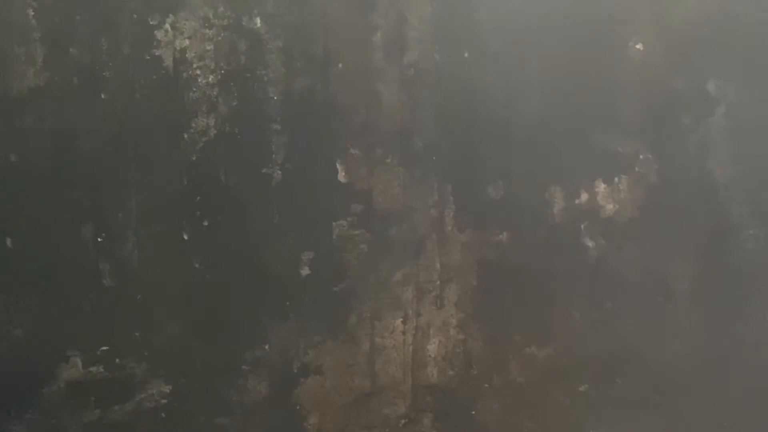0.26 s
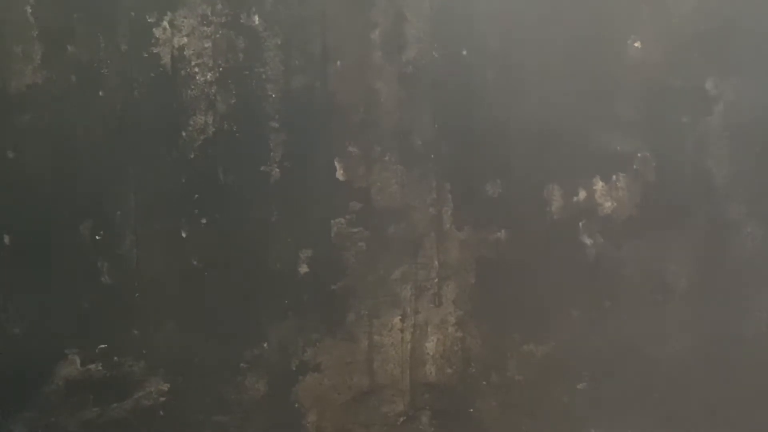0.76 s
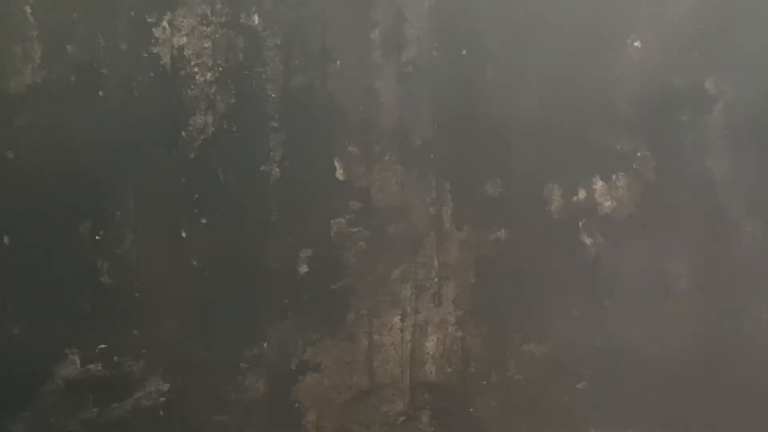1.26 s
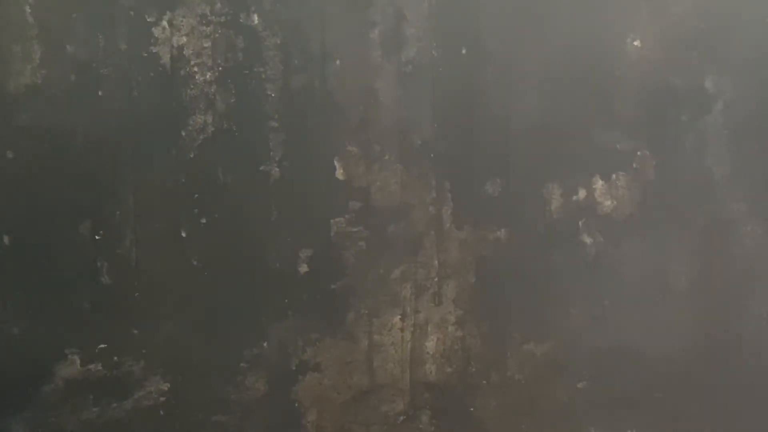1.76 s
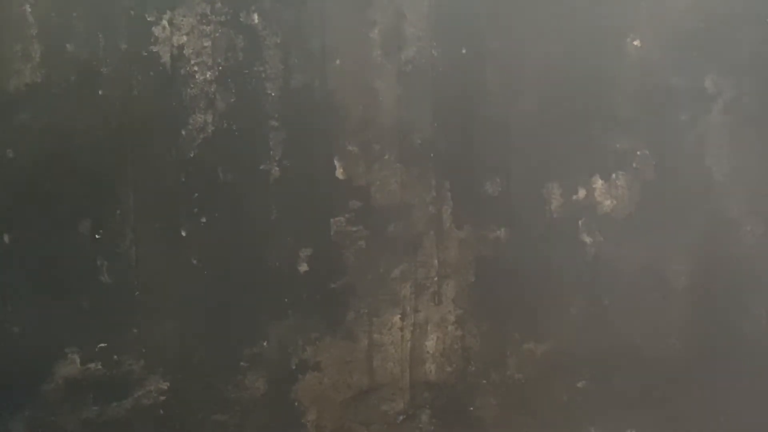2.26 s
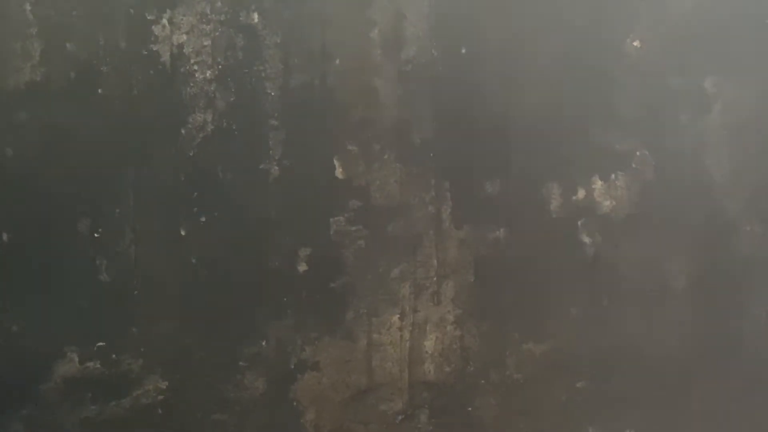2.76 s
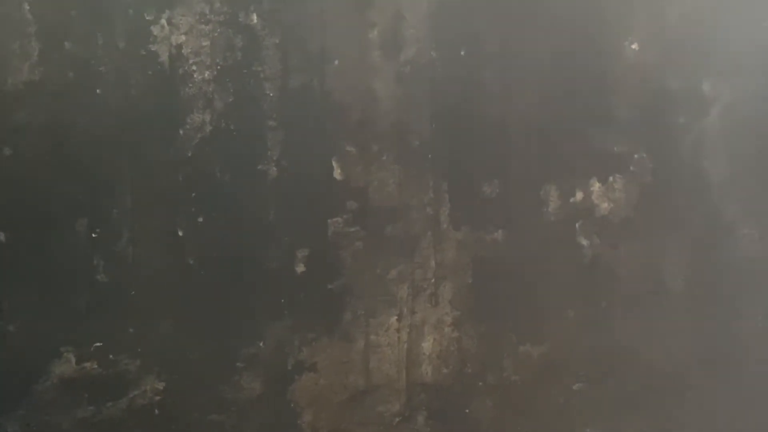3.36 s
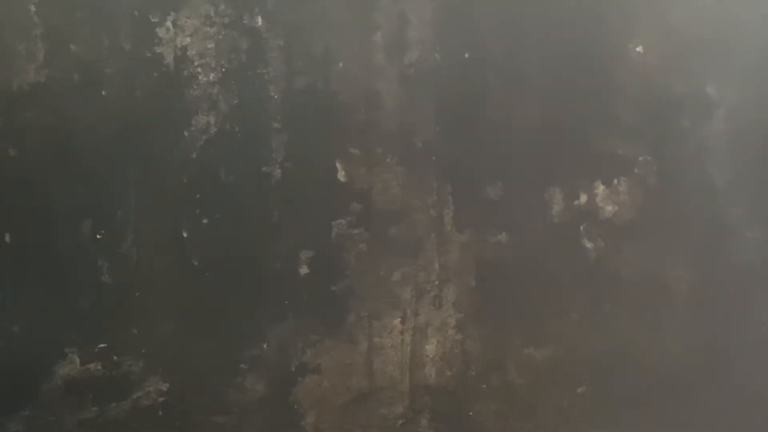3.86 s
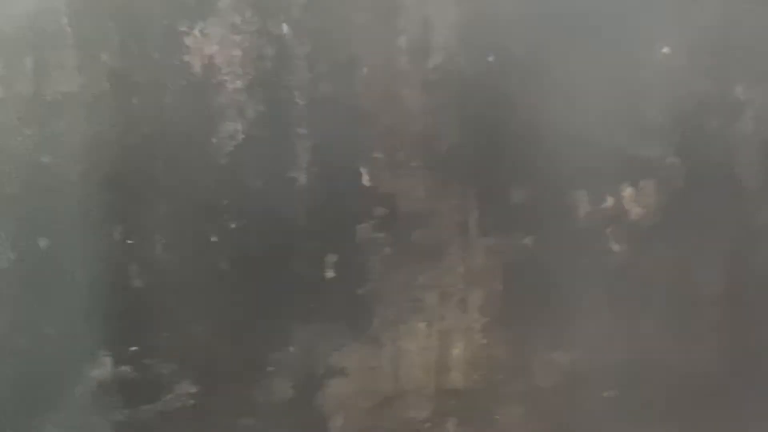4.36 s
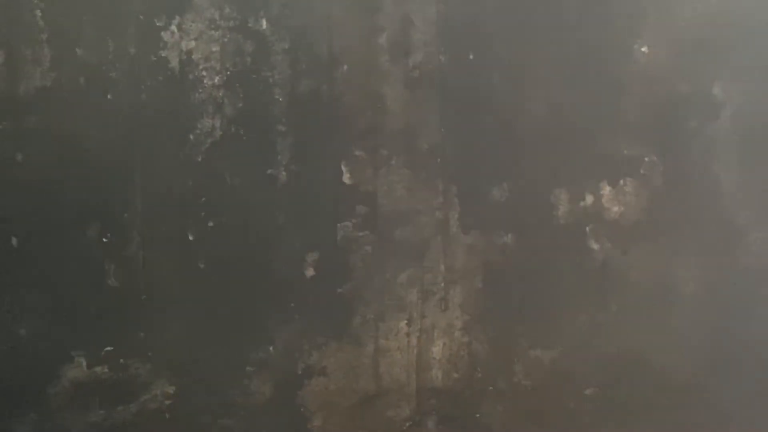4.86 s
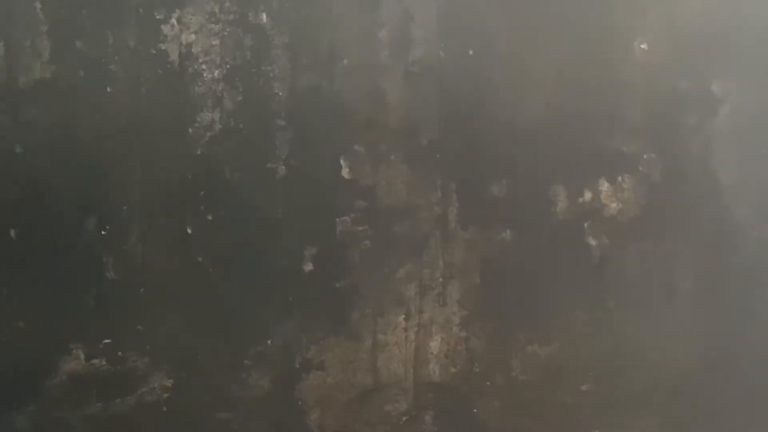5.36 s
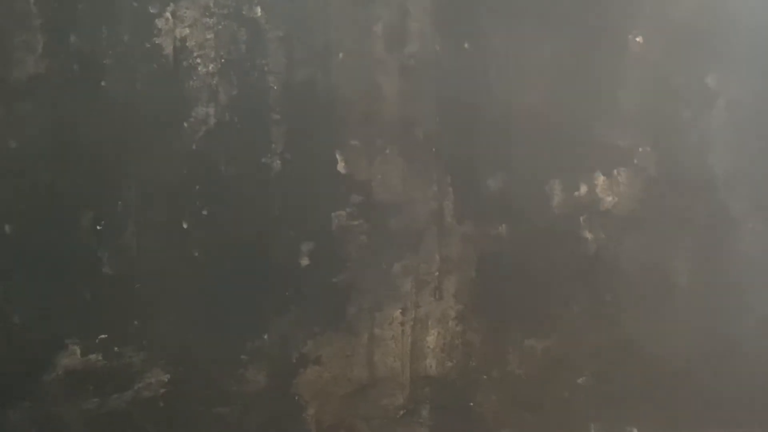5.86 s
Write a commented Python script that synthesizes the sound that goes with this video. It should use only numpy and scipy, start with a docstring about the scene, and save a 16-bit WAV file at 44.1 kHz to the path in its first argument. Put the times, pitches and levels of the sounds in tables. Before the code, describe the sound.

Steady deep roar of a subway car running through a tunnel, faint motor whine, one sharp knock on the window pane with quick bounces.

```python
"""Subway car in a tunnel, close to the window

Stereo microphone held near the pane: noise shaped by body resonances makes the rolling roar, wavering
sines the faint whine of motors and converter, short low cycles the thumps through the floor. Once something
knocks sharply on the pane and bounces twice: falling bending waves and short ringing ticks.
A limiter ducks the roar under the peaks, holds it down and lets go."""
import sys
import numpy as np
from scipy import signal
from scipy.fft import rfft, irfft, next_fast_len
from scipy.io import wavfile
from scipy.ndimage import minimum_filter1d

SR = 44100
rng = np.random.default_rng(int(sys.argv[2]) if len(sys.argv) > 2 else 0)


def output_pcm(signal):
    """Save a mono or channel-first signal as 16-bit PCM at the path in sys.argv[1].

    Samples are clipped to [-1, 1] before scaling.
    """
    pcm = np.clip(np.atleast_2d(signal).T, -1, 1) * 32767
    wavfile.write(sys.argv[1], SR, np.round(pcm).astype(np.int16))


N = 269890  # samples, about 6.1 s

# Above the first frequency left and right alternate between in phase and opposed;
# each half turn spans the second.
TURN_FROM_HZ, HALF_TURN_HZ = 7000, 1960


def from_db(db):
    """Amplitude gain of a level in dB."""
    return 10 ** (np.asarray(db) / 20)


def at_hz(rows, hz):
    """Columns of a table, joined by lines on a log-frequency axis."""
    f, *columns = np.transpose(rows)
    return [np.interp(np.log(hz), np.log(f), c) for c in columns]


def drift(rate_hz):
    """Slow random wander of spread 1: noise through two equal low-pass poles at the rate."""
    step = 40  # samples between drawn points
    r = np.exp(-2 * np.pi * step * rate_hz / SR)
    noise = rng.standard_normal(N // step + 4002)
    slow = signal.lfilter([1], [1, -2 * r, r * r], noise)[4000:]  # settled part only
    return np.interp(np.arange(N) / step, np.arange(len(slow)), slow / slow.std())


def roar(surge_db, flutter_db):
    """Wheel and rail noise in the car body; the right port hears part of the same noise, shifted in phase."""
    # Roar at the left port before the body resonances: f/Hz, level/dB per Hz
    roar_spectrum = [(22, -71), (43, -58.5), (60, -50), (300, -52), (400, -54), (680, -58.5), (790, -59.5),
                     (1050, -59.5), (1300, -63.5), (2500, -65), (3700, -72), (4200, -78.5), (4900, -79.5),
                     (7500, -93.5), (11200, -103), (12200, -112), (15000, -119)]
    # Droning resonances of the car body: f/Hz, width/Hz, level above the roar/dB
    body_modes = [(69.3, 3.3, 8), (112, 21.4, 5.5), (168, 12, 1.5), (194, 13.5, 4), (224.5, 6.8, 7.5),
                  (279.6, 3.8, 7), (297, 9.3, 2), (333.7, 28, 8), (346, 6.3, 3.5), (454.3, 25, 6),
                  (494, 6.6, 3), (562, 10, 1.5), (614.5, 36, 6.5), (682, 26, 6), (707, 10, 4.5)]
    # The two ports: f/Hz, left over right level/dB, coherence/0-1, right port's phase lead/rad
    port_pair = [(40, 2.6, .96, .15), (90, 2.5, .95, .12), (170, 0, .93, .1), (330, 4, .86, .3),
                 (440, 5.5, .35, 1), (600, 2.5, .42, 2.4), (900, 0, .3, 2.4), (1400, 1, .25, 1.5),
                 (1700, 4, .35, -.4), (2300, 7.5, .86, -.9), (2800, 5.5, .88, -.75), (3600, 6, .9, -.5),
                 (4300, 4.5, .72, -.3), (5700, 6, .45, 0), (7000, 0, .98, 0)]
    lull_s, lull_db, lull_length_s = 4.29, -1.5, 0.18  # the roar dips briefly

    size = next_fast_len(N)
    hz = np.maximum(np.fft.rfftfreq(size, 1 / SR), 1)
    gain = from_db(at_hz(roar_spectrum, hz)[0]) * np.sqrt(SR / 2)
    for mode_hz, width_hz, peak_db in body_modes:
        gain = gain * from_db(peak_db / (1 + (2 * (hz - mode_hz) / width_hz) ** 2))

    balance_db, coherence, lead = at_hz(port_pair, hz)
    turn = np.pi * np.maximum(hz - TURN_FROM_HZ, 0) / HALF_TURN_HZ
    # stepped phase turn: treble stays nearly in phase, then nearly opposed
    lead = lead + turn - np.sin(2 * turn) / 2
    shared, own = rfft(rng.standard_normal((2, size)))
    right = coherence * np.exp(1j * lead) * shared + np.sqrt(1 - coherence ** 2) * own
    right = from_db(-balance_db) * right
    noise = irfft(gain * np.array([shared, right]), size)[:, :N]

    t = np.arange(N) / SR
    level_db = lull_db * np.exp(-((t - lull_s) / lull_length_s) ** 2)
    level_db = level_db + surge_db * drift(2.1)  # slow surges
    level_db = level_db + flutter_db * drift(25)  # rough track
    return from_db(level_db) * noise


def tones(rows, waver_db, waver_rad):
    """Steady machine tones: sines at rms levels whose level and phase waver slightly."""
    right_lead_rad = -.2
    t, out = np.arange(N) / SR, np.zeros((2, N))
    for hz, left_db, right_db in rows:
        phase = 2 * np.pi * (hz * t + rng.random()) + waver_rad * drift(2.1)
        level = np.sqrt(2) * from_db(waver_db * drift(1.7))
        sines = np.sin([phase, phase + right_lead_rad])
        out += level * from_db([[left_db], [right_db]]) * sines
    return out


def thumps():
    """Dull thumps through the floor: each is a couple of low cycles that swell and fade."""
    # t/s, peak level at the left port/dB, f/Hz, length/s
    floor_thumps = [(0.225, -22, 65, 0.027), (2.751, -22, 55, 0.017), (3.511, -14.5, 88.5, 0.013),
                    (3.544, -16.5, 62.7, 0.022), (4.033, -21, 59, 0.027), (4.607, -14, 90, 0.0082),
                    (5.924, -11, 100, 0.0048), (5.953, -17, 57, 0.031)]
    t, out = np.arange(N) / SR, np.zeros(N)
    for s, db, hz, length_s in floor_thumps:
        swell = np.exp(-((t - s) / length_s) ** 2)
        out += from_db(db) * swell * np.cos(2 * np.pi * hz * (t - s))
    return out * from_db([[0], [-1.5]])  # left, right


def pane_wave(start_s, turns, fade_s, rise_s, frame_hz, frame_db, frame_t60, node_hz):
    """Bending waves in a pane outrun each other, high ones first: each cycle lasts about twice the one before.
    The window frame rings on below; one band is missing, as the microphone sits at a node of the pane."""
    t = np.arange(round(.15 * SR)) / SR
    sweep = np.exp(-(t / fade_s) ** 2) * np.cos(2 * np.pi * turns * np.log(1 + t / start_s))
    frame = from_db(frame_db - 60 * t / frame_t60) * np.cos(2 * np.pi * frame_hz * t)
    wave = (1 - np.exp(-t / rise_s)) ** 2 * (sweep + frame)
    return signal.lfilter(*signal.iirnotch(node_hz, 9, fs=SR), wave)


def knocks():
    """Each knock launches the bending wave; each contact rings the short tick modes, unevenly."""
    # A knock on the pane and its two bounces launch bending waves: t/s, level/dB
    pane_knocks = [(4.4907, 8), (4.5399, -4.5), (4.5690, -11)]
    # Brief gritty contacts on the pane: t/s, level/dB, pitch factor, ring length factor,
    # added brightness/dB over the octave above bright_from_hz, added weight below heavy_below_hz/dB
    pane_contacts = [(4.4913, -15, 1, 1, 3, 17.5), (4.4919, -6.5, .99, 1.3, 4, -6),
                     (4.4955, -19, 1.05, .8, -1, 0), (4.4984, -5, 1.12, .9, -9, -14),
                     (4.5412, -5, 1.07, .75, -1.5, -6), (4.5414, -24, .86, 1.3, 0, 19),
                     (4.5525, -29, 1, .8, 0, 0), (4.5690, -23, 1, .8, 0, 0), (5.9080, -38, 1.2, 1, 8, 0)]
    # Modes the tick rings with, before those factors: f/Hz, left level/dB, right level/dB, t60/s
    tick_modes = [(680, -4, -13, .018), (1050, -12, -21, .007), (2000, -6, -13, .005),
                  (3100, -4, -11, .0055), (4800, -11, -20, .005), (5800, -15, -23, .003),
                  (7100, -11, -11, .0035), (8200, -14, -13, .003), (10000, -23, -23, .002),
                  (11500, -19, -17, .002), (13400, -23, -22, .002)]
    bright_from_hz, heavy_below_hz = 3000, 1500

    wave = pane_wave(start_s=.0015, turns=1.55, fade_s=.015, rise_s=.003,
                     frame_hz=96, frame_db=-13, frame_t60=.2, node_hz=500)
    duller = from_db(-.5) * signal.lfilter([.14], [1, -.86], wave)
    wave = np.array([wave, duller])  # left, right
    out = np.zeros((2, N))
    for s, wave_db in pane_knocks:
        i = round(s * SR)
        out[:, i:i + wave.shape[1]] += from_db(wave_db) * wave

    t = np.arange(round(.012 * SR)) / SR
    touch = 1 - np.exp(-t / .00012)  # soft onset, time constant in s
    grit = rng.standard_normal((len(pane_contacts), len(tick_modes), 2))
    for contact, chance in zip(pane_contacts, grit):
        s, contact_db, pitch, length, bright_db, weight_db = contact
        i = round(s * SR)
        for k, (mode, (spread, phase)) in enumerate(zip(tick_modes, chance)):
            hz, left_db, right_db, t60 = mode
            treble_db = bright_db * np.clip(np.log2(hz / bright_from_hz), 0, 1)
            level_db = contact_db + treble_db + weight_db * (hz < heavy_below_hz)
            level_db = level_db + 1.5 * spread - 60 * t / (t60 * length)
            turn = np.pi * max(hz * pitch - TURN_FROM_HZ, 0) / HALF_TURN_HZ
            turn = turn * np.array([[0], [1]])  # right port only
            sine = np.sin(2 * np.pi * hz * pitch * t + .5 * phase + turn)
            ringing = (-1) ** (k + 1) * from_db(level_db) * sine  # signs alternate from mode to mode
            out[:, i:i + len(t)] += from_db([[left_db], [right_db]]) * touch * ringing
    return out


def let_go(db, db_per_s):
    """Follows rises at once and falls at a set rate."""
    ramp = db_per_s * np.arange(N) / SR
    return np.maximum.accumulate(db + ramp) - ramp


def scene():
    """Roar, whine, other tones, thumps and knocks at the two ports."""
    motor_hz = 112.01  # the motor's pole rate
    # Whine on multiples of the pole rate: multiple, left level/dB, right level/dB
    whine_orders = [(2, -41, -42), (21, -44.5, -52), (22, -52, -58), (24, -60, -64), (39, -66, -67),
                    (41, -65, -77), (42, -64, -66), (43, -66, -73), (44, -68, -71), (45, -69, -75),
                    (46, -73, -77), (59, -79, -80), (60, -79, -78), (61, -70, -70)]
    # Other steady tones of shafts, fans and converter: f/Hz, left level/dB, right level/dB
    machine_tones = [(35, -40, -42), (166.9, -42, -37), (332.4, -46, -44), (866.7, -58, -52),
                     (901.3, -49.5, -44.5), (2430.6, -53, -64), (2702, -58, -63), (4502, -70, -77),
                     (4771, -68, -74), (4861.5, -69, -75), (4952, -69, -74), (5132, -73, -77),
                     (6308, -76, -80)]
    whine = [(k * motor_hz, *levels) for k, *levels in whine_orders]
    out = roar(surge_db=.3, flutter_db=0.45)
    out = out + tones(whine, waver_db=1.3, waver_rad=.2)
    out = out + tones(machine_tones, waver_db=1.5, waver_rad=0.5)
    return out + thumps() + knocks()


def record(dry):
    """A limiter ducks at peaks, holds and lets go; what slips past is rounded off, the top is cut."""
    limit_db, attack_s, cutoff_hz = -.2, .0005, 16400
    hold_s, held_share, release_db_s = .108, .72, 50  # part of the ducking is held, then released slowly
    quick_release_db_s = 120  # the full ducking is not held

    peak_db = 20 * np.log10(np.abs(dry).max(axis=0) + 1e-9)  # both ports duck together
    over_db = np.maximum(peak_db - limit_db, 0)
    hold = 2 * round(hold_s * SR / 2) + 1
    held_db = -minimum_filter1d(-over_db, size=hold, origin=hold // 2)  # the largest of the recent past
    slow_db = let_go(held_share * held_db, release_db_s)
    quick_db = let_go(over_db, quick_release_db_s)
    r = np.exp(-1 / (attack_s * SR))
    duck_db = signal.lfilter([1 - r], [1, -r], np.maximum(slow_db, quick_db))
    out = dry * from_db(-duck_db)
    rounded = 1.15 * np.tanh(out / 1.15)
    return signal.sosfilt(signal.cheby2(24, 70, cutoff_hz, fs=SR, output="sos"), rounded)


dry = scene()
out = record(dry)
output_pcm(out)
```